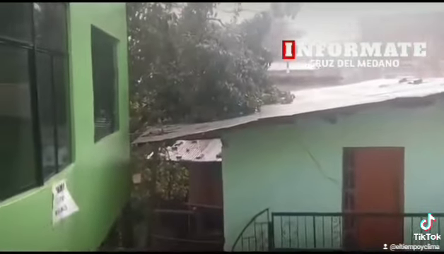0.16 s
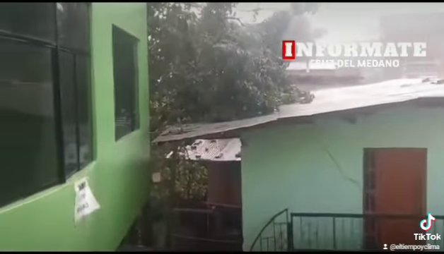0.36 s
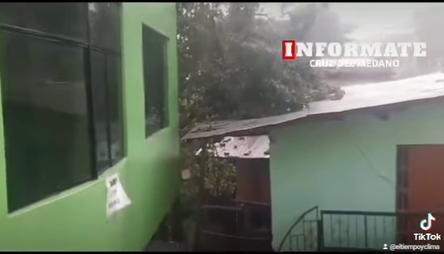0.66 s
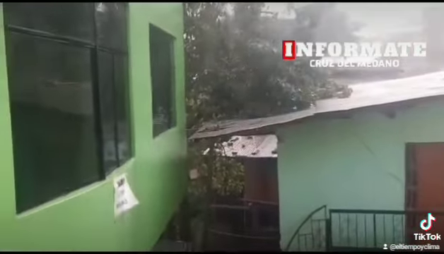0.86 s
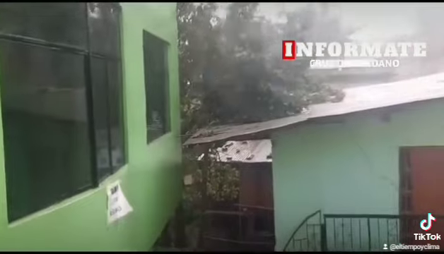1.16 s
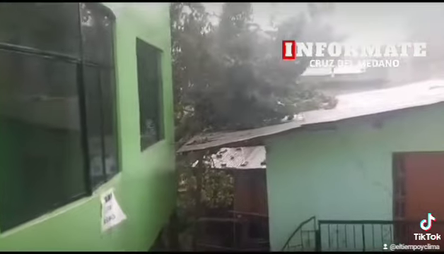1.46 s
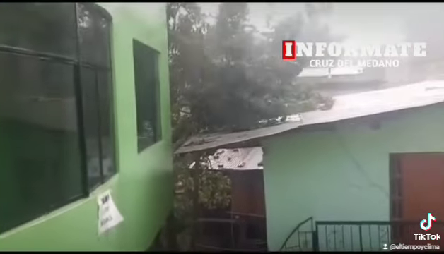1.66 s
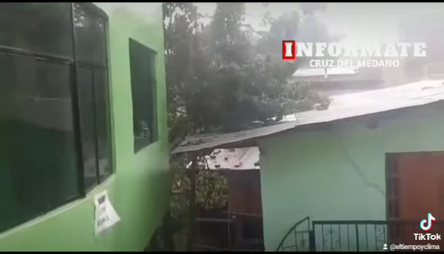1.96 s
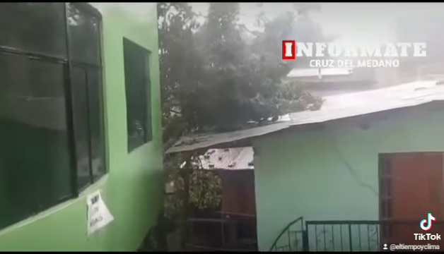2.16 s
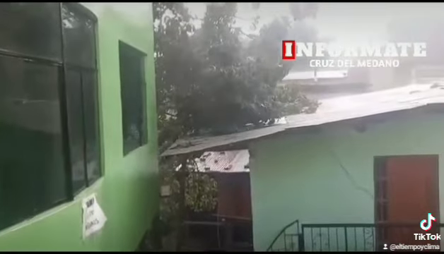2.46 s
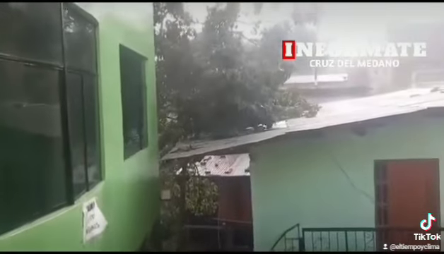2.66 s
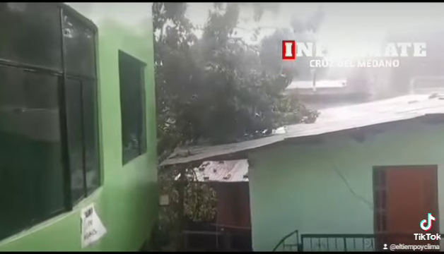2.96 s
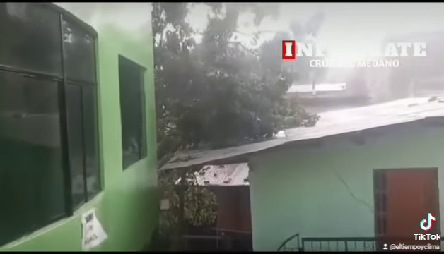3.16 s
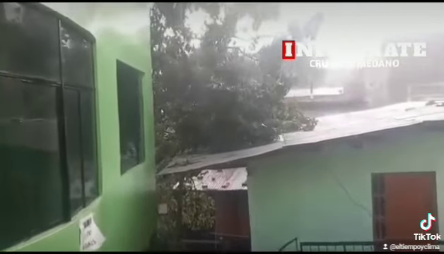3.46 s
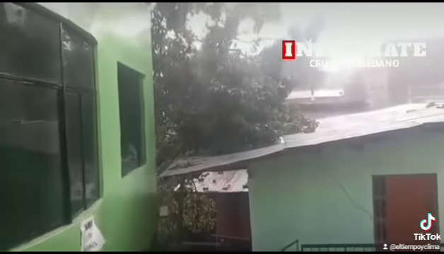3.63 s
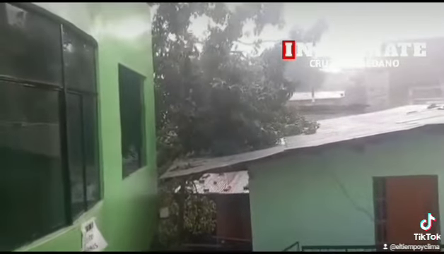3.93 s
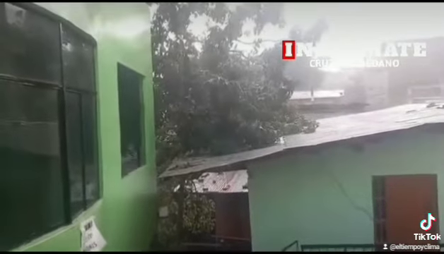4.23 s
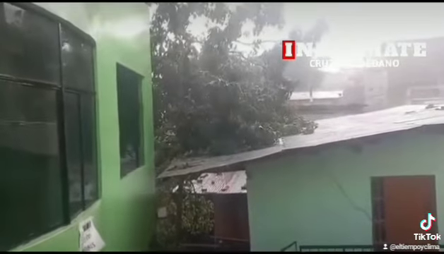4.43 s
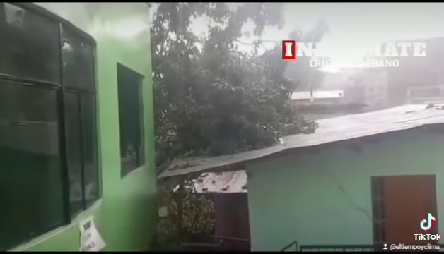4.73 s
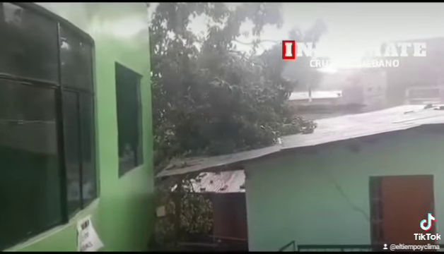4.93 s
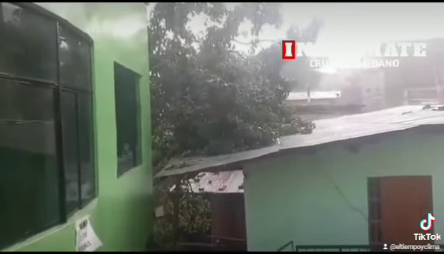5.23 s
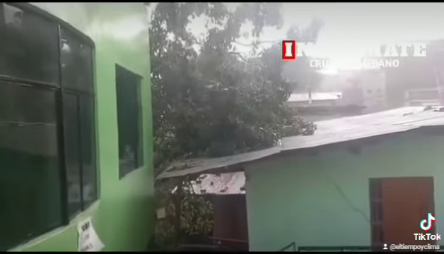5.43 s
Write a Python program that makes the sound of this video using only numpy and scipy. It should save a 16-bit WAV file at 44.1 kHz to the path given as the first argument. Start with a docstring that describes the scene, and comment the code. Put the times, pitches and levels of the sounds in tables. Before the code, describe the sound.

A torrential downpour drums on sheet-metal roofs across a small yard, a dense even roar with metallic pings, splash hiss and fine spray. Sharp drops tick close by, mostly early on. Around three seconds wind starts hitting the handheld microphone, with a strong low thump soon after, then rumbling flutter until the end. The rain dips slightly at the thump.

```python
"""A steady roar of heavy rain on sheet-metal roofs, heard from a sheltered spot across a small yard.
Dense random impacts, shaped by the metal, make drumming and roar; pings, splash hiss and fine spray lie on top.
Close drops tick. Faint wind grows halfway through into thumps and fluttering rumble: eddies at the microphone.
The strongest thump makes the gain control duck the rain, and the gain stays down."""
import sys
import numpy as np
from scipy import signal
from scipy.fft import rfft, irfft, next_fast_len
from scipy.io import wavfile
from scipy.ndimage import uniform_filter1d

SR = 44100
rng = np.random.default_rng(int(sys.argv[2]) if len(sys.argv) > 2 else 0)


def waveform_to_disk(signal):
    """Save audio, clipped to [-1, 1], as 16-bit WAV at the path in sys.argv[1]."""
    frames = np.transpose(np.atleast_2d(signal))
    scaled = np.clip(frames, -1, 1) * 32767
    samples = np.round(scaled).astype(np.int16)
    wavfile.write(sys.argv[1], SR, samples)


N = 246519


def from_db(db):
    """Decibels to gain."""
    return 10 ** (np.asarray(db) / 20)


def rms_one(x):
    """Scale to an rms of one."""
    return x / np.sqrt(np.mean(x ** 2) + 1e-20)


def seconds():
    """Time of every sample."""
    return np.arange(N) / SR


def bump(t, centre_s, half_s):
    """Bell-shaped swell of height one."""
    return np.exp(-0.5 * ((t - centre_s) / half_s) ** 2)


def drift(rate_hz):
    """Slow random curve with a spread of one: low-passed noise, computed every 40 samples."""
    pole = np.exp(-80 * np.pi * rate_hz / SR)
    noise = rng.standard_normal(N // 40 + 2002)
    slow = signal.lfilter([1], [1, -2 * pole, pole * pole], noise)[2000:]  # drop the settling
    return np.interp(np.arange(N) / 40, np.arange(len(slow)), rms_one(slow))


def coloured(x, spectrum):
    """Causal (minimum-phase) filter with the given spectrum; rms one."""
    size = 2 * next_fast_len(N // 2 + 1)
    hz, level_db = np.transpose(spectrum)
    bins_hz = np.maximum(np.arange(size // 2 + 1) * SR / size, 1)
    gain = from_db(np.interp(np.log(bins_hz), np.log(hz), level_db))
    cepstrum = irfft(np.log(gain), size)
    cepstrum[1:size // 2] *= 2
    cepstrum[size // 2 + 1:] = 0
    response = np.exp(rfft(cepstrum))
    return rms_one(irfft(rfft(x, size) * response, size)[..., :N])


# gusts at the microphone: (time of full strength [s], rise [s], hold [s], fall [s], level [dB])
GUSTS = [(0.705, .03, .03, .04, -35.5), (0.98, 0.069, 0.069, .06, -39), (1.275, .05, .08, 0.034, -37.5),
         (1.77, .02, .02, .027, -37), (2.038, .015, 0.024, 0.064, -37.5),
         (2.915, 0.0076, 0.084, 0.045, -25.5), (3.23, 0.03, 0.2, 0.092, -21),
         (3.55, 0.022, 0.021, 0.13, -22.5), (3.797, 0.027, .03, .03, -27), (4.036, .03, .01, 0.053, -26),
         (4.287, 0.048, .05, .13, -29), (4.585, 0.036, .025, 0.086, -20), (4.753, .015, 0.13, .02, -21.5),
         (4.916, .012, .27, 0.04, -20), (5.235, .012, 0.09, 0.043, -22.5), (5.375, 0.013, .015, 0.038, -24),
         (5.48, .02, 0.017, 0.041, -20.5)]
GUST_FLUTTER_DB, GUST_FLUTTER_HZ = 1.7, 20
BREEZE_DB, BREEZE_FLUTTER_DB, BREEZE_FLUTTER_HZ = -45.5, 4, 9.5


def gust_strength():
    """Gusts swell, hold and die away, fluttering, over a light fluttering breeze; in dB."""
    t = seconds()
    power = 0
    for full_s, rise_s, hold_s, fall_s, level_db in GUSTS:
        rise = np.maximum(full_s - t, 0) / rise_s
        fall = np.maximum(t - full_s - hold_s, 0) / fall_s
        power = power + (from_db(level_db) * np.exp(-rise - fall)) ** 2
    gusts = np.sqrt(power) * from_db(GUST_FLUTTER_DB * drift(GUST_FLUTTER_HZ))
    breeze = from_db(BREEZE_DB + BREEZE_FLUTTER_DB * drift(BREEZE_FLUTTER_HZ))
    return 20 * np.log10(np.hypot(gusts, breeze))


def turbulence(spectrum, steadying):
    """Low noise whose own swells are partly flattened, so that the gust sets its strength."""
    eddies = coloured(rng.standard_normal(N), spectrum)
    envelope = np.abs(signal.hilbert(eddies, next_fast_len(N))[:N])
    swell = np.sqrt(uniform_filter1d(envelope ** 2, size=1100) + 1e-9)  # 25 ms window
    return rms_one(eddies / swell ** steadying)


STRONG_GUST_DB = -18.5  # reference for deep eddies and small puffs
# boom spectrum: (frequency [Hz], relative level [dB])
WIND_COLOUR = [(12, -56), (25, -38), (42, -12), (62, -12), (80, 9.5), (95, 2.5), (120, -5.5), (165, -14),
               (250, -25.5), (350, -48), (600, -34), (1500, -68)]
# deep-eddy spectrum: (frequency [Hz], relative level [dB])
DEEP_COLOUR = [(12, -48), (28, -14), (45, 1), (65, 25), (85, -13), (130, -28), (300, -67)]


def wind(gust_db, level_db, side_db, deep_db):
    """Turbulence at the microphone ports, booming near 80 Hz, slightly different on each side."""
    boom = turbulence(WIND_COLOUR, steadying=0.73)
    # stronger gusts carry larger, deeper eddies
    deep_gain = from_db(deep_db + 1.1 * (gust_db - STRONG_GUST_DB))
    deep = deep_gain * turbulence(DEEP_COLOUR, steadying=0.58)
    apart = coloured(rng.standard_normal(N), WIND_COLOUR) * np.array([[1], [-1]])
    return from_db(gust_db + level_db) * (boom + deep + from_db(side_db) * apart)


# big puffs breaking up at the microphone: (time [s], half-length [s], level [dB])
PUFFS = [(2.937, 0.023, -26), (3, 0.014, -32), (3.329, 0.027, -19.5), (3.41, .018, -28), (3.519, .016, -25),
         (4.618, .018, -24.5), (4.85, 0.05, -28), (4.935, .016, -28), (5.05, 0.032, -23.5),
         (5.174, 0.024, -34), (5.265, 0.031, -32), (5.372, .018, -26.5)]
# puff spectrum: (frequency [Hz], relative level [dB])
PUFF_COLOUR = [(60, -25), (110, 11), (155, 1.5), (250, 2), (350, -5), (480, -7.5), (900, -36), (2000, -60)]
SMALL_PUFF_DB, PUFF_FOLLOWS_DB_PER_DB = -31.5, 2.3


def puffs(gust_db):
    """Smaller eddies reaching higher than the boom: timed rushes over a part that follows the gusts."""
    t = seconds()
    big = sum(from_db(level_db) * bump(t, centre_s, half_s) for centre_s, half_s, level_db in PUFFS)
    small = from_db(SMALL_PUFF_DB + PUFF_FOLLOWS_DB_PER_DB * (gust_db - STRONG_GUST_DB))
    return np.hypot(big, small) * turbulence(PUFF_COLOUR, steadying=0.63)


# strong eddies: (time [s], peak level [dB], push length [s], thump pitch [Hz])
BUFFETS = [(2.914, -17, 0.0032, 106), (3.055, -17, 0.0075, 94), (3.262, -9, 0.0074, 80),
           (3.329, -2.5, 0.0099, 90), (3.406, -8.5, .0055, 82), (4.589, -22, 0.0073, 102),
           (4.927, -16, 0.0024, 126.6), (5.023, -12, .0037, 135), (5.104, -6.5, 0.0066, 81),
           (5.18, -25, 0.0037, 80), (5.351, -11.5, 0.0027, 123)]


def buffets(width_octaves):
    """A strong eddy gives one smooth push of pressure; the port band-passes it into a short thump."""
    t = seconds()
    out = np.zeros(N)
    for centre_s, peak_db, length_s, hz in BUFFETS:
        band_hz = hz * 2 ** (width_octaves * np.array([-0.5, 0.5]))
        port = signal.butter(2, band_hz, "band", fs=SR, output="sos")
        phase = np.clip((t - centre_s + length_s / 2) / length_s, -0.5, 0.5)
        push = np.cos(np.pi * phase) ** 2
        thump = signal.sosfilt(port, push + 1e-18)
        out += from_db(peak_db) * thump / np.abs(thump).max()
    return out


# single drops landing close by: (time [s], peak level [dB])
NEAR_DROPS = [(.419, -17), (.546, -12), (.561, -6), (.596, -12), (.626, -13), (.714, -11), (.864, -20),
              (.912, -7), (1.387, -6), (2.19, -8), (2.437, -15), (2.616, -14), (2.774, -19), (2.97, -15),
              (3.385, -18)]
# tick spectrum: (frequency [Hz], relative level [dB])
TICK_COLOUR = [(200, -33), (900, -19), (2100, 7), (3200, -2), (6400, -7), (7100, -10), (7900, -47),
               (13000, -37)]


def near_drops(per_s, small_db):
    """Each close impact is one sharp filtered click: timed ones, and many small ones at random."""
    lands = rng.random(N) < per_s / SR
    clicks = lands * from_db(small_db + rng.normal(0, 2.5, N)) * rng.choice([-1, 1], N)
    for time_s, peak_db in NEAR_DROPS:
        clicks[round(time_s * SR)] = from_db(peak_db)
    tick = coloured(signal.unit_impulse(N), TICK_COLOUR)[:SR // 100]
    return signal.oaconvolve(clicks, tick / np.abs(tick).max())[:N]


def shower(per_s, spread_db, wash_db):
    """Near drops as clicks of uneven size, over the smooth wash of far ones."""
    sizes = from_db(spread_db * np.minimum(rng.exponential(1, N), 4)) * rng.choice([-1, 1], N)
    near = rms_one(sizes * (rng.random(N) < per_s / SR))
    return rms_one(near + from_db(wash_db) * rng.standard_normal(N))


def patchy(x, low_hz, high_hz, patchy_db, rate_hz, count):
    """Neighbouring frequency bands swell and fade independently, each on its own slow random curve."""
    hz, spectrum = np.arange(N // 2 + 1) * SR / N, rfft(x)
    centres_hz = np.linspace(low_hz, high_hz, count)
    out = np.zeros(N)
    for share in np.eye(count):
        band = irfft(spectrum * np.interp(hz, centres_hz, share), N)
        out += band * from_db(patchy_db * drift(rate_hz))
    return rms_one(out)


# fine-spray spectrum: (frequency [Hz], relative level [dB])
SPRAY_COLOUR = [(6500, -30), (8150, -9.5), (8800, 1), (9900, 3), (10600, -2), (11400, 4.5), (13400, 2),
                (13900, -20)]


def spray(droplets):
    """Droplet impacts and as much plain noise, filtered to the top treble."""
    hiss = coloured(droplets + rng.standard_normal(N), SPRAY_COLOUR)
    return patchy(hiss, 9660, 12100, patchy_db=3.0, rate_hz=11.0, count=4)


# splash spectrum: (frequency [Hz], relative level [dB])
SPLASH_COLOUR = [(1500, -26.5), (2500, 2.5), (3100, -0.5), (3850, 2), (4300, 0), (5200, -0.4), (6000, 0.5),
                 (6800, -4), (7000, -11), (7450, -13.5), (7800, -52), (9000, -38)]


def splash(impacts, droplets):
    """Splashes hiss: droplets with half the roof impacts, filtered to the treble."""
    hiss = coloured(0.5 * impacts + droplets, SPLASH_COLOUR)
    return patchy(hiss, 3160, 6980, patchy_db=1.38, rate_hz=16.0, count=7)


# lowest sheet modes, blurred: (frequency [Hz], relative level [dB])
DRUM_COLOUR = [(85, -11), (130, -3), (215, -1.5), (262, 3.2), (340, -1.5), (500, -2), (590, 0), (660, 2),
               (760, -0.2), (900, -3.5), (1150, -21), (2000, -52)]


def drumming():
    """Impacts excite the lowest sheet modes, which blur into a drumming."""
    drum = coloured(shower(per_s=3200, spread_db=3.0, wash_db=3.5), DRUM_COLOUR)
    return patchy(drum, 194, 1050, patchy_db=2.5, rate_hz=18, count=7)


def ring(clicks, hz, t60_s):
    """Resonator: a unit click sets a decaying sine of initial height one ringing."""
    r, w = from_db(-60 / (t60_s * SR)), 2 * np.pi * hz / SR
    return signal.lfilter([0, np.sin(w)], [1, -2 * r * np.cos(w), r * r], clicks + 1e-18)


# sheet modes rung by fat drops from the eaves: (frequency [Hz], relative level [dB], t60 [s])
SHEET_MODES = [(266, -6.5, 0.068), (434.4, -2.5, 0.13), (664, -3.5, 0.1), (875, -4, 0.054), (1280, 6, 0.18),
               (1556, -3.5, 0.16), (1655, 0, 0.051), (1950, -3, 0.19), (2082, -5, 0.11), (2260, -8, 0.053),
               (2636, -16, 0.12)]


def fat_drops(per_s, spread_db):
    """Single heavy drops; where each lands decides how strongly it rings each mode (random here)."""
    lands = rng.random(N) < per_s / SR
    hits = lands * from_db(spread_db * np.minimum(rng.exponential(1, N), 3))
    out = np.zeros(N)
    for hz, level_db, t60_s in SHEET_MODES:
        mode = ring(hits * rng.standard_normal(N), hz, t60_s)
        out += from_db(level_db) * rms_one(mode)
    return rms_one(out)


def patter(per_s, bunch_db, bunch_rate_hz, spread_db, t60_s, low_hz, high_hz):
    """Drops come in bunches; each lands on another spot of metal and pings at a pitch of its own."""
    lands = rng.random(N) < per_s / SR * from_db(bunch_db * drift(bunch_rate_hz))
    sizes = from_db(spread_db * np.minimum(rng.exponential(1, N), 3))
    pitches_hz = low_hz + (high_hz - low_hz) * rng.random(N)
    age_s = np.arange(SR // 5) / SR
    decay = np.exp(-np.log(1000) * age_s / t60_s)
    out = np.zeros(N + len(age_s))
    for i in np.flatnonzero(lands):
        out[i:i + len(age_s)] += sizes[i] * decay * np.sin(2 * np.pi * pitches_hz[i] * age_s)
    return rms_one(out[:N])


# roar and ping spectrum: (frequency [Hz], relative level [dB])
ROOF_COLOUR = [(500, -20), (800, -7.5), (1000, -2.5), (1250, -2.7), (1400, -1.35), (1650, -1.5),
               (2000, -0.36), (2220, -0.1), (2450, -7.5), (2700, -10), (3000, -14), (4500, -49)]


def roof_roar(impacts):
    """Impacts ring the metal: a dense roar, distinct pings and fat drops."""
    roar = patchy(coloured(impacts, ROOF_COLOUR), 1110, 2820, patchy_db=1.13, rate_hz=13.0, count=9)
    drops = patter(per_s=300, bunch_db=1.9, bunch_rate_hz=24, spread_db=1.5,
                   t60_s=0.19, low_hz=1098.8, high_hz=2900)
    pings = coloured(drops, ROOF_COLOUR)
    return rms_one(roar + from_db(-1.5) * pings) + from_db(-13.5) * fat_drops(per_s=60, spread_db=0.5)


# slow level curve of the rain layers; builds, eases around the thump, then rises: (time [s], level [dB])
RAIN_LEVEL = [(0.0, -1.5), (0.3, -1), (0.6, 0.5), (3.0, 0), (3.7, -1.3), (5.59, 0.7)]
# passing sheets of rain: (time [s], half-length [s], roof and drum change [dB], splash change [dB])
SURGES = [(.4, 0.032, 1.5, -1), (0.58, 0.055, -0.6, 1.2), (0.744, .04, 0.5, -0.5), (0.9, .05, 1, -1),
          (1.126, 0.022, 1.5, 0), (1.41, .018, 2, 1.2), (2.056, 0.017, 0.3, 2.8), (2.15, 0.018, 3, -0.5),
          (2.255, 0.017, 0.5, -.5), (2.375, .028, 0.7, 1), (2.647, 0.037, 0.9, 0.5), (2.818, 0.07, 1, 1),
          (3.2, 0.094, 1.2, 1.3), (3.873, 0.06, 0.8, 2), (4.267, 0.02, -1, 3), (4.772, 0.094, 1.8, 0.5),
          (4.96, .045, 1.3, 2.8), (5.266, .03, 1, -1.3), (5.462, .05, 1, 0)]
DRUM_DB, ROOF_DB, SPLASH_DB, SPRAY_DB = -31, -23.5, -29, -46
# dB per dB: drum and roof re level curve; spray re level curve plus splash surges
DRUM_FOLLOWS, ROOF_FOLLOWS, SPRAY_FOLLOWS = 0.18, 0.069, 1.65


def rain():
    """Each impact rings the metal and splashes; level curve and surges weight the parts."""
    t = seconds()
    curve_db = np.interp(t, *np.transpose(RAIN_LEVEL))
    on_roofs_db, on_splash_db = np.zeros(N), np.zeros(N)
    for centre_s, half_s, roof_db, splash_db in SURGES:
        surge = bump(t, centre_s, half_s)
        on_roofs_db += roof_db * surge
        on_splash_db += splash_db * surge
    impacts = shower(per_s=3200, spread_db=2.0, wash_db=5.0)
    droplets = shower(per_s=3500, spread_db=1.0, wash_db=1.5)
    flurries = drift(29)  # splashes come in uneven bunches
    drum_db = DRUM_DB + DRUM_FOLLOWS * curve_db + on_roofs_db
    roof_db = ROOF_DB + ROOF_FOLLOWS * curve_db + on_roofs_db + 0.18 * drift(10)
    splash_db = SPLASH_DB + curve_db + on_splash_db + 0.5 * flurries
    spray_db = SPRAY_DB + SPRAY_FOLLOWS * (curve_db + on_splash_db) + 1.2 * flurries
    return (spray(droplets) * from_db(spray_db)
            + splash(impacts, droplets) * from_db(splash_db)
            + drumming() * from_db(drum_db)
            + roof_roar(impacts) * from_db(roof_db))


def scene():
    """Rain all around, wind right at the microphone."""
    gust_db = gust_strength()
    air = wind(gust_db, level_db=0.6, side_db=-25, deep_db=-3.5)
    air = air + puffs(gust_db) + buffets(width_octaves=0.69)
    return air + near_drops(per_s=15, small_db=-22.0) + rain()


THRESHOLD_DB, SQUEEZE_DB_PER_DB, SINK_DB_PER_S = -18, 0.29, 0.1


def gain_control(x):
    """A loud moment turns everything down at once; the gain never recovers and sinks slowly on."""
    power = uniform_filter1d(np.mean(x ** 2, axis=0), size=900)  # 20 ms window
    level_db = 10 * np.log10(power + 1e-12)
    cut_db = SQUEEZE_DB_PER_DB * np.maximum(level_db - THRESHOLD_DB, 0)
    sink_db = SINK_DB_PER_S * seconds()
    # a new cut acts only if it exceeds the reduction already reached
    return x * from_db(-sink_db - np.maximum.accumulate(cut_db - sink_db))


# narrow microphone dip: (frequency [Hz], width [Hz], depth [0-1])
PORT_DIP = (1805, 82, 0.53)
LOW_CUT_HZ, CUTOFF_HZ = 41, 13700


def record(dry):
    """Microphone bass cut and narrow mid dip, then gain control, then a steep top cut."""
    hz, width_hz, depth = PORT_DIP
    lean = signal.sosfilt(signal.butter(4, LOW_CUT_HZ, "high", fs=SR, output="sos"), dry)
    peak = signal.lfilter(*signal.iirpeak(hz, hz / width_hz, fs=SR), lean)
    levelled = gain_control(lean - depth * peak)
    return signal.sosfilt(signal.ellip(10, 0.1, 80, CUTOFF_HZ, fs=SR, output="sos"), levelled)


dry = scene()
out = record(dry)
waveform_to_disk(out)
```